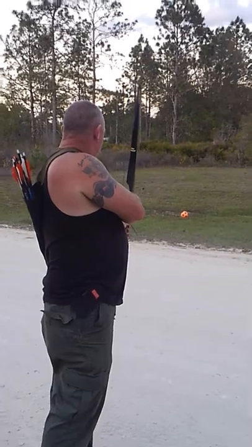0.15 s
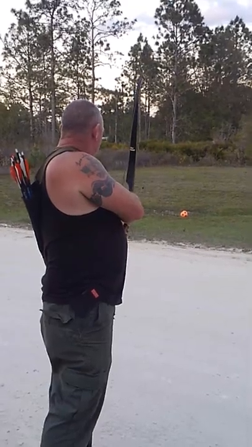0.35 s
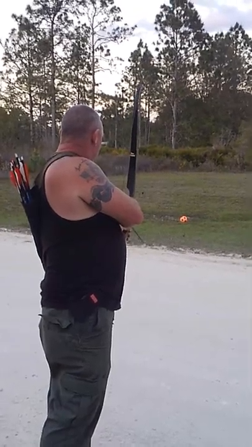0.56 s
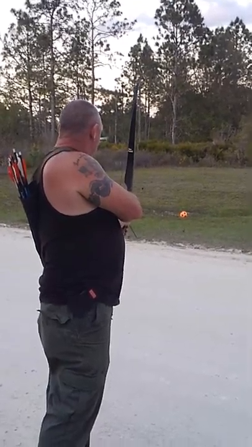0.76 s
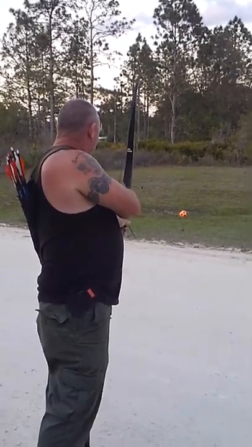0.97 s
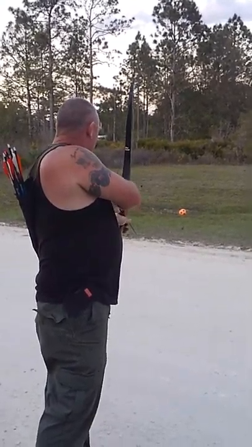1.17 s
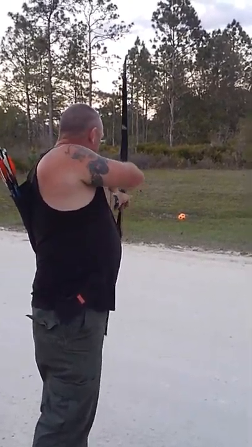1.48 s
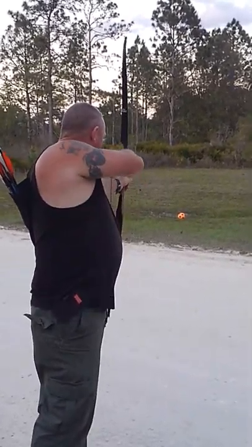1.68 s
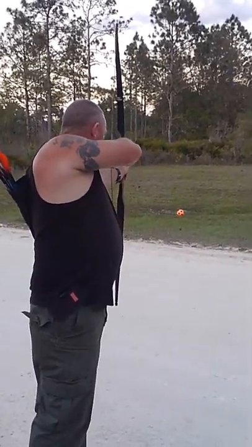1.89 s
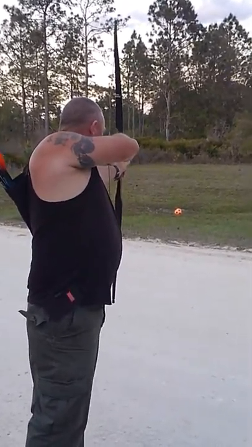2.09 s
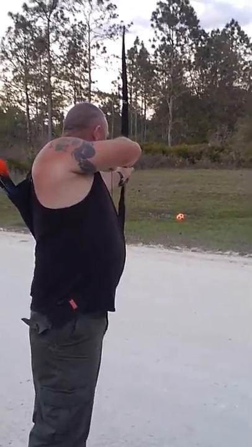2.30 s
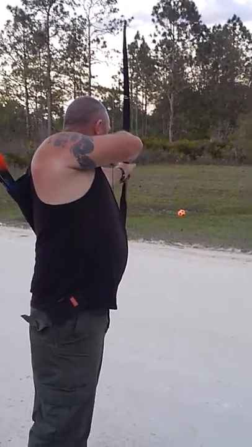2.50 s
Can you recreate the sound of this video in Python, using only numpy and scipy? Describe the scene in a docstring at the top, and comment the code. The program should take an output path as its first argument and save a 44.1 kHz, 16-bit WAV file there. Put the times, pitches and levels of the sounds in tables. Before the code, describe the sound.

A far engine drones low, around 76 hertz, wavering throughout with a barely audible whine, its upper harmonics stronger from 1.25 to 2.1 seconds. Dull road rumble, soft traffic swells, steady airy hiss and thin high insect song surround it. Cloth brushes faintly at 0.05, then rustles from 1.9 to the end as arms rise; a bright tiny tick at 1.94, a duller one at 2.07. No bow release.

```python
"""Bow raised on a gravel track

Before any shot, quiet evening air: road rumble and hiss are noise shaped by a spectrum, and thin insect
song and swells of far traffic are noise in a resonance. A far engine drones on harmonics of a drifting
cycle under a faint whine. As the arms come up, cloth rustles as swells of resonant noise, and two faint
ticks sound as short scrapes, each with a ring gliding upward."""
import sys
import numpy as np
from scipy import signal
from scipy.fft import rfft, irfft
from scipy.io import wavfile
from scipy.ndimage import uniform_filter1d

SR = 44100
rng = np.random.default_rng(int(sys.argv[2]) if len(sys.argv) > 2 else 0)


def makeup_ratio(level_db):
    """Linear amplitude ratio for a level in decibels (20 dB per factor of ten)."""
    decades = np.asarray(level_db, float) / 20
    return 10 ** decades


def transcribe(signal):
    """Save signal, clipped to [-1, 1], as a 16-bit WAV file at the path in sys.argv[1]."""
    frames = np.atleast_2d(signal).T
    limited = np.clip(frames, -1, 1)
    pcm = np.round(limited * 32767).astype(np.int16)
    wavfile.write(sys.argv[1], SR, pcm)


N = 116865  # samples in the scene


def unit(x):
    """Normalisation: divides a signal by its root mean square."""
    return x / np.sqrt(np.mean(x ** 2))


def walk(rate_hz):
    """Low-pass random process: noise averaged twice, about rate_hz changes a second, spread 1."""
    k = int(SR / rate_hz)
    smooth = uniform_filter1d(uniform_filter1d(rng.standard_normal(N), k), k)
    return unit(smooth - smooth.mean())


def colour(points):
    """Spectral shaping: white noise weighted by (f/Hz, level/dB) points joined on a log axis, rms 1."""
    hz, db = np.array(points, float).T
    f = np.arange(N // 2 + 1) * SR / N + 1  # 1 Hz up, to keep the logarithm finite
    gain = makeup_ratio(np.interp(np.log(f), np.log(hz), db))
    return unit(irfft(rfft(rng.standard_normal(N)) * gain, N))


def band(hz, width_hz):
    """Resonance: white noise under one peak, width_hz wide at half amplitude, rms 1."""
    f = np.arange(N // 2 + 1) * SR / N
    resonance = 1 / (1 + ((f - hz) / width_hz * 2) ** 2)
    return unit(irfft(rfft(rng.standard_normal(N)) * resonance, N))


def swells(t, rows, rough_db, width):
    """Amplitude modulation: half-sine swells of uneven noise, each resonance width times its centre."""
    out = np.zeros(N)
    for start, length, db, hz in rows:
        envelope = np.sin(np.pi * np.clip((t - start) / length, 0, 1))
        out += makeup_ratio(db + rough_db * walk(46)) * envelope * band(hz, width * hz)
    return out


# Far road rumble, relative spectral density: f/Hz, level/dB
RUMBLE_SPECTRUM = [(20, -14), (35, -28), (50, -2), (110, -3.5), (165, -12), (215, -10), (300, -15),
                   (1200, -27.5)]


def road_rumble():
    """Low-frequency noise: far road sound with its energy in the bass, slowly swelling by chance."""
    level_db = -47 + 1.35 * walk(2.56)
    return makeup_ratio(level_db) * colour(RUMBLE_SPECTRUM + [(16000, -54.5)])


# Swells of far traffic: start t/s, length t/s, level/dB before roughness, centre f/Hz
TRAFFIC_SWELLS = [(1.1, 0.22, -54, 121), (1.55, 0.44, -50.5, 129.5), (2.52, 0.3, -47, 118),
                  (0, 0.13, -59, 213), (.68, 0.47, -60.5, 218), (1.344, 0.24, -55.5, 225),
                  (1.8, .48, -54.5, 210)]


def far_traffic(t):
    """Narrow-band noise: rounded swells in low resonances."""
    return swells(t, TRAFFIC_SWELLS, rough_db=4.0, width=0.22)


# Air and microphone hiss, relative spectral density: f/Hz, level/dB
HISS_SPECTRUM = [(300, 0), (1000, -1), (2500, -5), (5000, -8), (8000, -9.5), (12000, -11.5), (16400, -11)]


def hiss():
    """Broadband noise: a smooth falling spectrum with a slight flicker of level."""
    level_db = -51.5 + 0.4 * walk(4.3)
    return makeup_ratio(level_db) * colour([(60, -52)] + HISS_SPECTRUM)


def insects(t):
    """Narrow-band noise: insect song as one high resonance, fluttering and slowly fading."""
    start_db, fade_db_per_s = -67.5, -0.5
    level_db = start_db + fade_db_per_s * t + 2.2 * walk(7)
    return makeup_ratio(level_db) * band(5640, width_hz=520)


# Faint steady whine, likely of the same machine as the drone: f/Hz, level/dB rms before flutter
WHINE_TONES = [(886, -78), (1181, -75.5)]


def whine(t):
    """Pure tones: sinusoids of fixed frequency and random phase, each fluttering alone."""
    out = np.zeros(N)
    for hz, db in WHINE_TONES:
        level_db = db + 2 * walk(4.3)
        out += makeup_ratio(level_db) * np.sin(2 * np.pi * (hz * t + rng.random()))
    return np.sqrt(2) * out  # sine peak to rms


# Main note of the engine as the air carries it: t/s, level/dB rms before flutter
MAIN_NOTE = [(0.0, -83), (0.07, -56), (0.15, -46), (1.03, -43.5), (1.1, -54.5), (1.28, -47.5), (1.45, -50),
             (1.49, -43.5), (1.65, -59), (1.75, -40), (1.84, -59), (1.95, -43), (2.05, -51.5),
             (2.29, -44.5), (2.34, -43), (2.44, -48), (2.55, -58), (2.65, -53)]
# Weaker harmonics: multiple of the cycle, level/dB against the mean main note, flutter level/dB
HARMONICS = [(3, -9.5, 1.5), (4, -14.5, 1.5), (7, -23.5, 2)]


def engine(t):
    """Harmonic series: a main note at twice the drifting cycle, and multiples that flutter alone."""
    cycle_hz, relative_drift = 37.91, 0.0041
    phase = 2 * np.pi * np.cumsum(cycle_hz * (1 + relative_drift * walk(2.57))) / SR
    main_db = np.interp(t, *np.array(MAIN_NOTE).T)
    out = makeup_ratio(main_db + 0.67 * walk(10)) * np.sin(2 * phase)
    # The weaker harmonics grow for a stretch
    growth_start_s, growth_length_s, growth_db = 1.25, 0.85, 4.5
    growth = growth_db * np.sin(np.pi * np.clip((t - growth_start_s) / growth_length_s, 0, 1))
    for multiple, db, flutter_db in HARMONICS:
        level_db = main_db.mean() + db + growth + flutter_db * walk(7.5)
        out += makeup_ratio(level_db) * np.sin(multiple * phase + 2 * np.pi * rng.random())
    return np.sqrt(2) * out  # sine peak to rms


# Cloth moving: start t/s, length t/s, level/dB before roughness, centre f/Hz
CLOTH_MOVES = [(0.036, 0.19, -61, 1490), (1.876, 0.34, -58.5, 566), (2.05, 0.81, -59.5, 1300)]


def cloth(t):
    """Friction noise: cloth as rounded swells of uneven noise in broad resonances."""
    return swells(t, CLOTH_MOVES, rough_db=3.0, width=0.79)


# Faint scuffs of bow or arrow: start t/s, ring level/dB rms at the top of the envelope,
# starting pitch f/Hz, rise t/s, relative pitch gain per rise time
SCUFFS = [(1.942, -56, 4600, .004, .15), (2.073, -53, 300, .005, .6)]


def ticks(t):
    """Transient excitation: a quick rise and decay of scrape noise and a ring gliding upward."""
    out = np.zeros(N)
    for start, db, hz, rise, glide in SCUFFS:
        u = np.clip((t - start) / rise, 0, 50)  # time in rise times
        ring = np.sqrt(2) * np.sin(2 * np.pi * hz * rise * (u + glide * u ** 2 / 2))
        top_hz = (1 + glide) * hz  # pitch at the top of the envelope
        scrape = makeup_ratio(-1) * band(top_hz, top_hz)
        out += makeup_ratio(db) * u * np.exp(1 - u) * (ring + scrape)
    return out


def scene():
    """Superposition: the pressures of all sources add at one microphone."""
    t = np.arange(N) / SR
    machine = engine(t) + whine(t)
    background = road_rumble() + far_traffic(t) + hiss() + insects(t)
    archer = cloth(t) + ticks(t)
    return (machine + background + archer)[None]


def roll_off(x):
    """The treble ends steeply here."""
    return signal.sosfilt(signal.butter(12, 17480, fs=SR, output="sos"), x)


def record(dry):
    """Linear filtering: the microphone's bass roll-off and a steep top cut, frequencies in Hz."""
    bass_rolloff = signal.butter(2, 30, "high", fs=SR, output="sos")
    top_cut = signal.ellip(12, 0.2, 70, 16350, fs=SR, output="sos")
    mix = signal.sosfilt(np.vstack([bass_rolloff, top_cut]), dry)
    return roll_off(mix)


dry = scene()
out = record(dry)
transcribe(out)
```